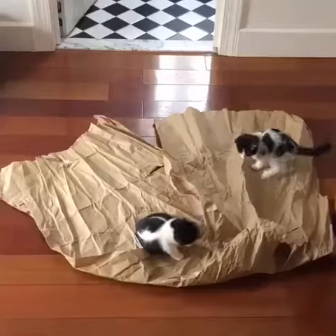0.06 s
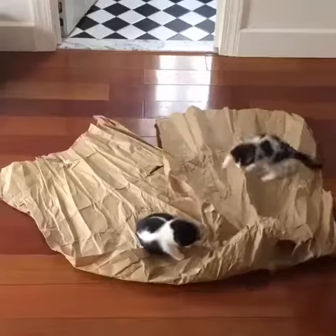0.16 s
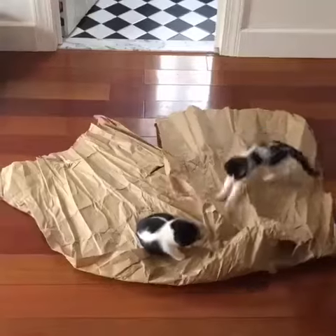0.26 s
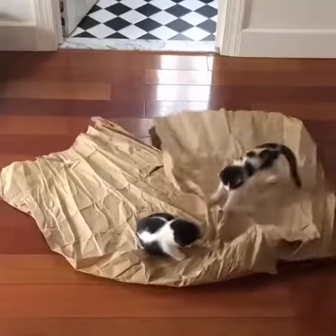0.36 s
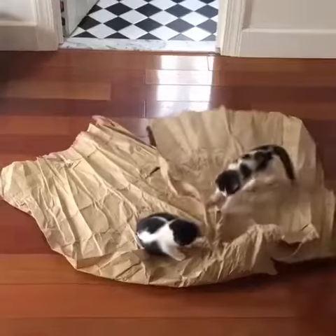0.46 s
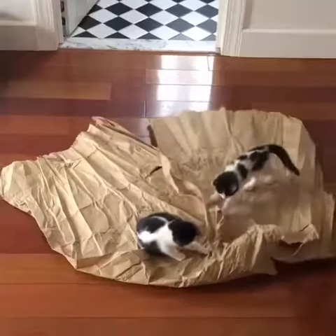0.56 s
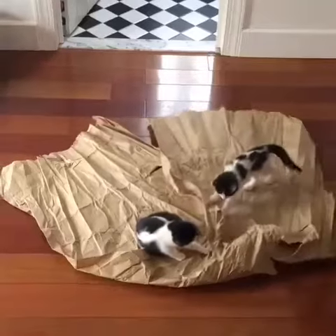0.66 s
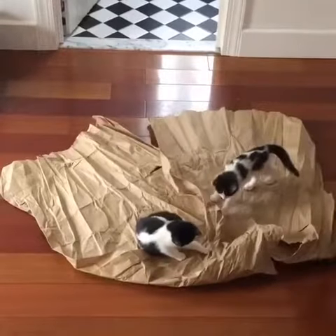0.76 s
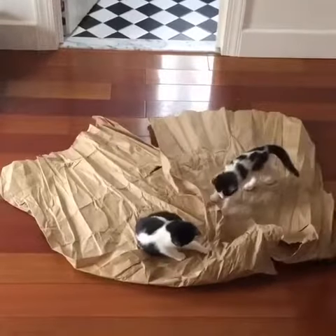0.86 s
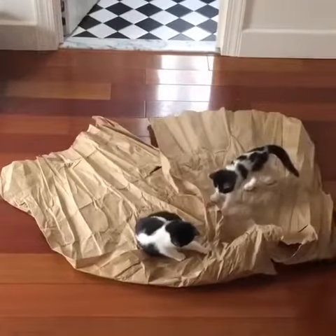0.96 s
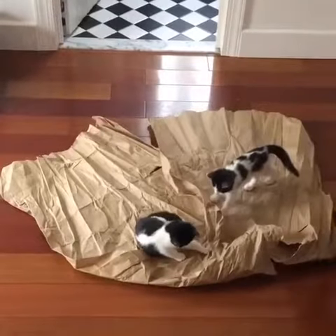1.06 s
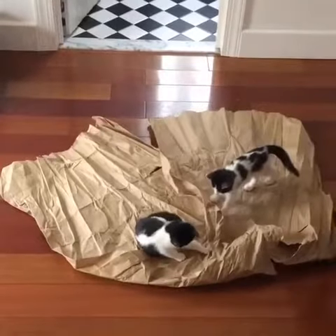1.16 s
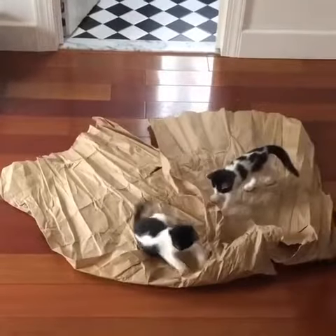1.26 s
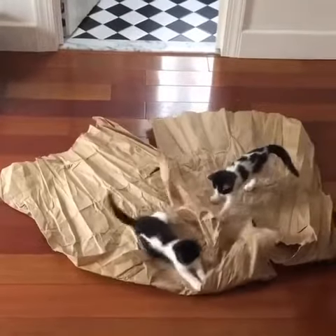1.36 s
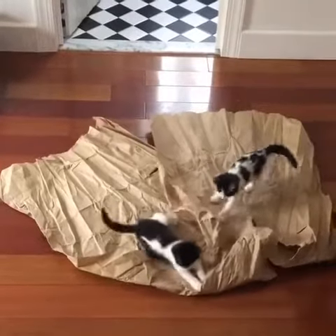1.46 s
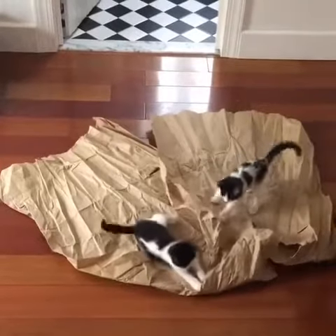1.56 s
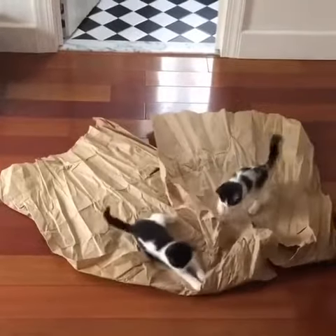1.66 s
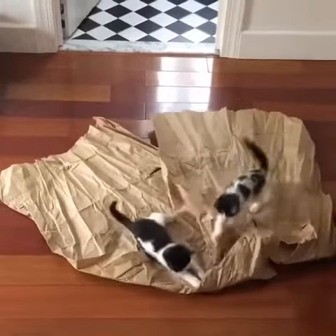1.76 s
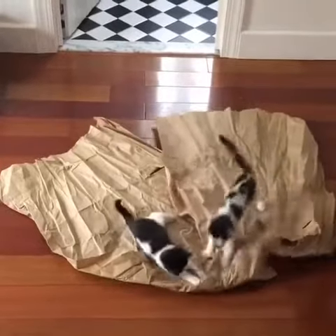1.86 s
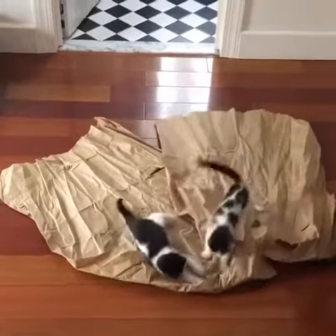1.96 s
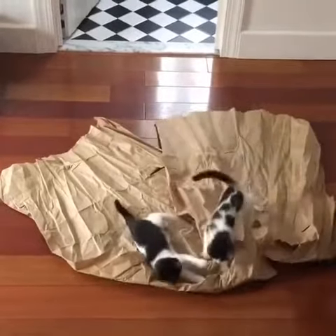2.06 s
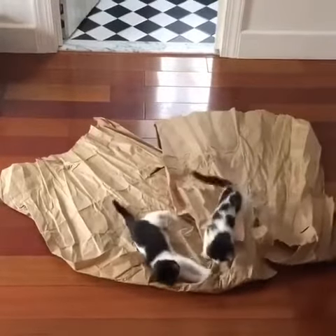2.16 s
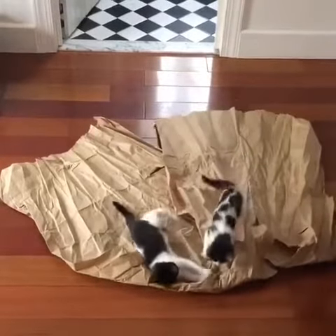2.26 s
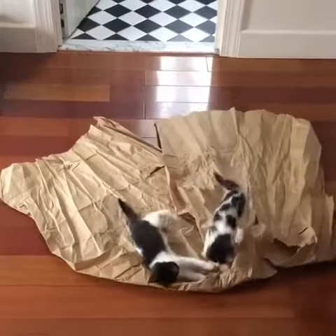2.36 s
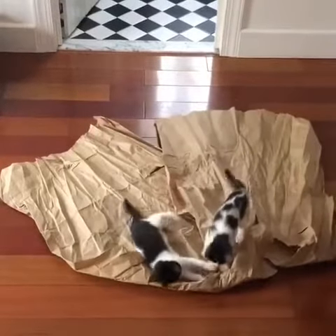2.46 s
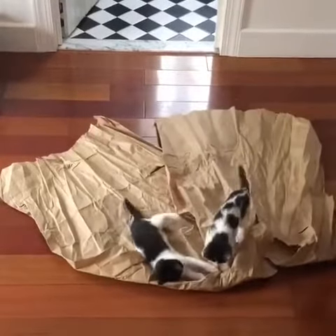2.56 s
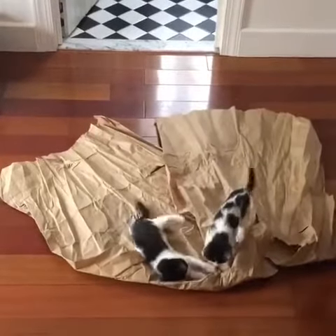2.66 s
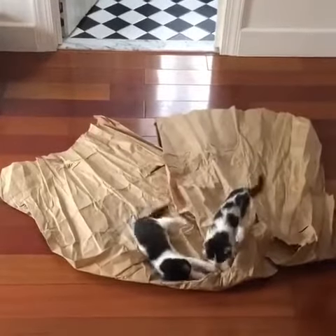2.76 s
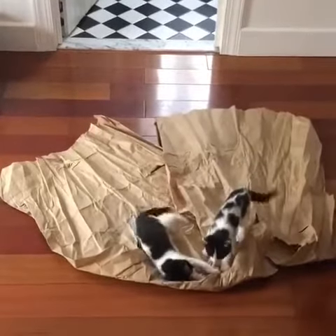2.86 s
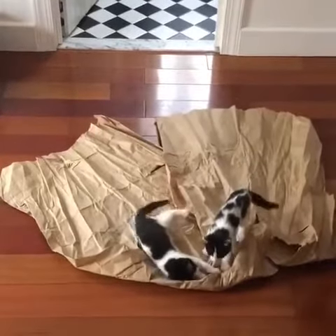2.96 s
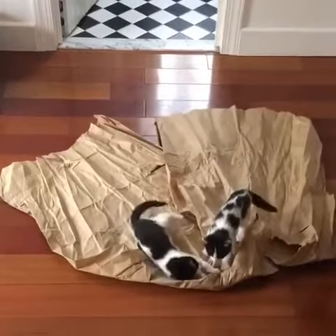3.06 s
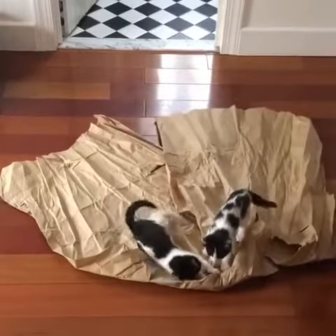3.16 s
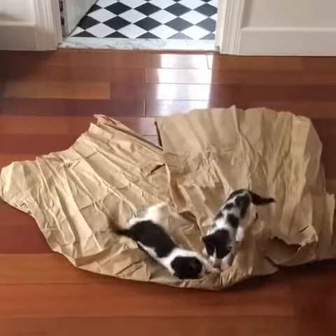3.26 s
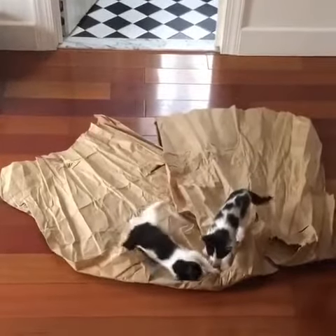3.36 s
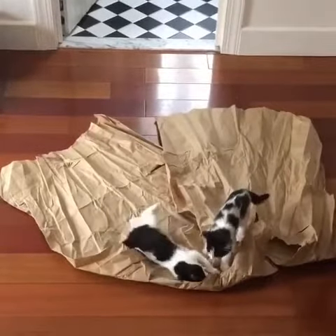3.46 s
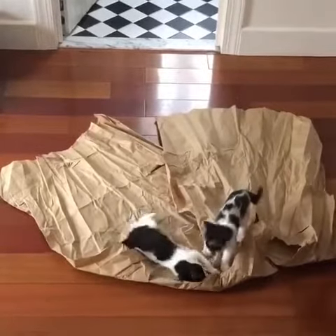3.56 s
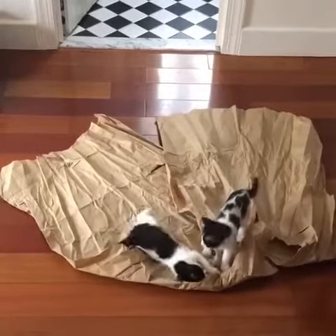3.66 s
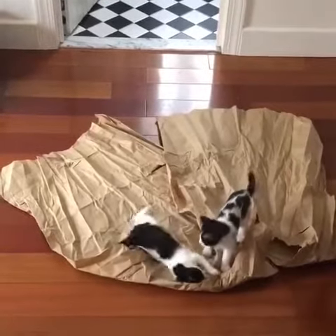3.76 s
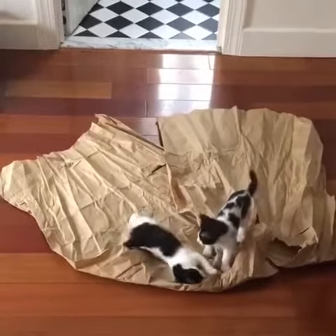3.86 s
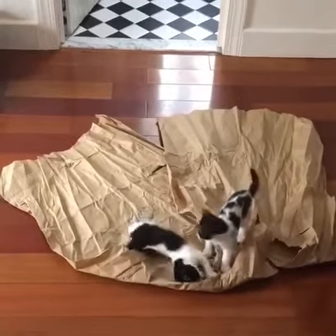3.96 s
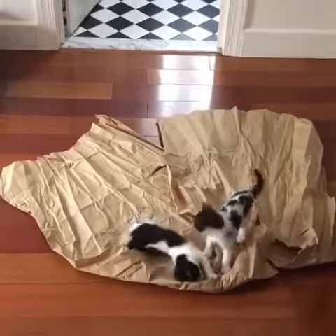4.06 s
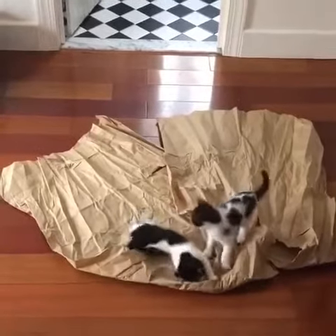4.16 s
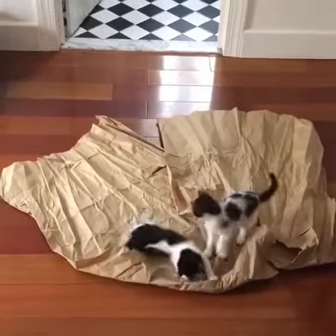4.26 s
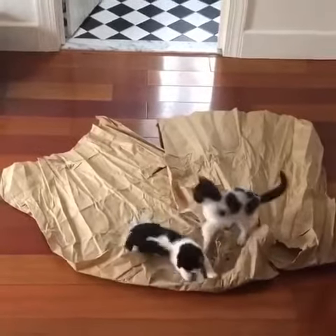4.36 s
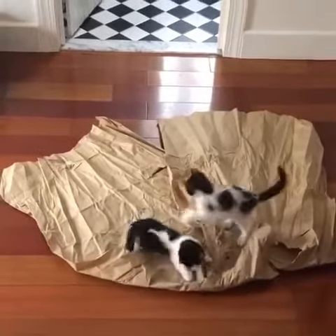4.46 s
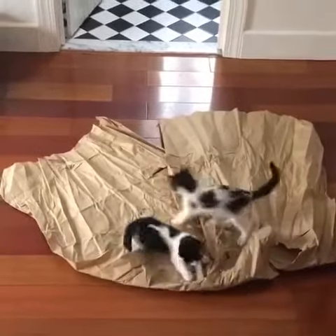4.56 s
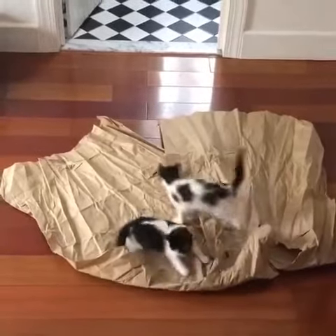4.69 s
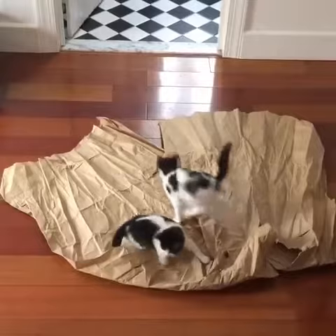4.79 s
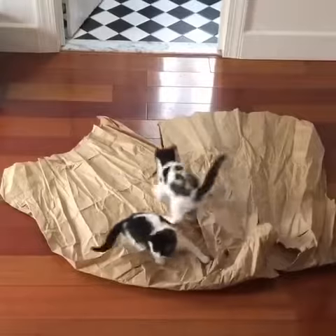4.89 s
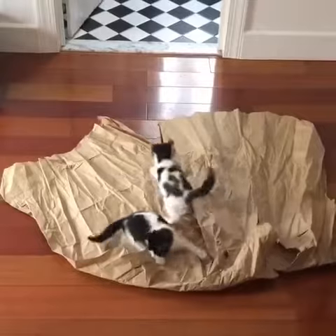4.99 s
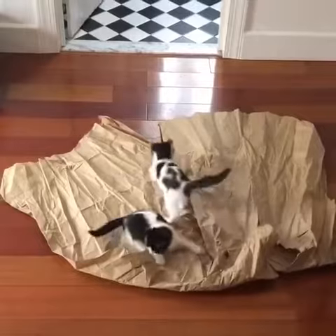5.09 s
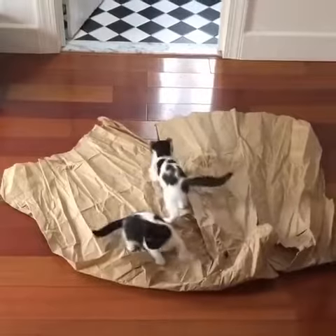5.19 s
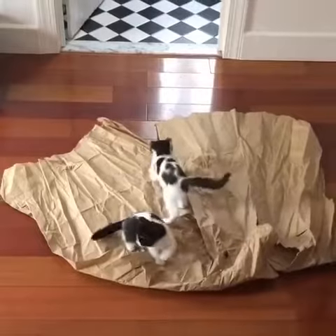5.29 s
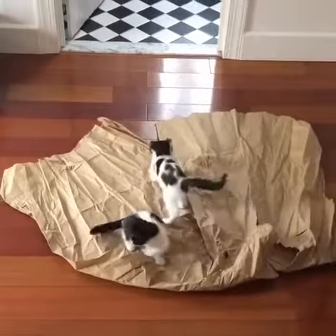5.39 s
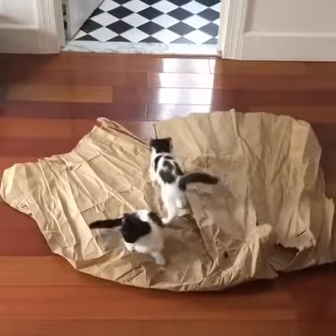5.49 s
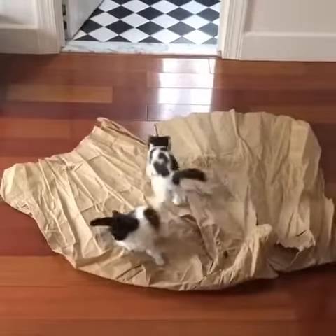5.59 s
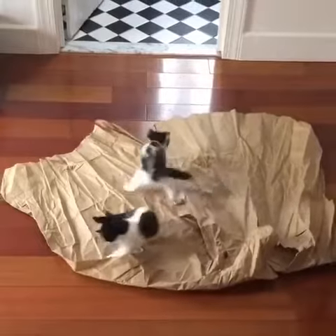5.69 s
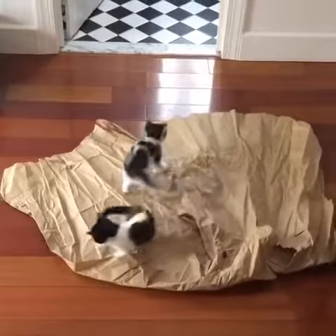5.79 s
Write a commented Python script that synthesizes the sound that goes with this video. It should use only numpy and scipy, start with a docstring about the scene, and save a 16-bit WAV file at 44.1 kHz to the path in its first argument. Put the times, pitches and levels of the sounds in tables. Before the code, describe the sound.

Sharp paper snaps and dry crinkling come in quick flurries over padded knocks on wooden boards, in a lightly echoing room.

```python
"""A soft knock comes first, then bursts of crackling: two kittens pounce on crumpled packing paper on a floor.
Each move sets off a swarm of short decaying tones, one for each tiny crease that buckles in the sheet.
Stiff creases snap alone (a ring, a rattle and a crack), and paws thump the boards with low, damped rings.
A phone held above hears it all in a bare, ringing room of noise-built echoes, with faint air and a low hum."""
import sys
import numpy as np
from scipy import signal
from scipy.fft import rfft, irfft, next_fast_len
from scipy.io import wavfile
from scipy.ndimage import uniform_filter1d, map_coordinates

SR = 44100
rng = np.random.default_rng(int(sys.argv[2]) if len(sys.argv) > 2 else 0)


def unload_audio(sound):
    """Save the sound as a 16-bit wav file, at the path given as the first command line argument."""
    columns = np.transpose(np.atleast_2d(sound))
    # keep every value between -1 and 1, then stretch to whole-number steps
    steps = np.round(np.clip(columns, -1, 1) * 32767)
    wavfile.write(sys.argv[1], SR, steps.astype(np.int16))


N = 257103
TIME = np.arange(N) / SR  # seconds


def undb(db):
    """Turn decibels into a gain."""
    return 10 ** (np.asarray(db) / 20)


def unit(x):
    """Scale a sound to an rms (average strength) of 1."""
    return x / np.sqrt(np.mean(x ** 2))


def along_hz(hz, points):
    """Read between (f/Hz, value) points, with pitch spaced in octaves as we hear it."""
    f, value = np.transpose(points)
    return np.interp(np.log(np.maximum(hz, 1)), np.log(f), value)


def colour(x, points):
    """Make some pitches louder and others softer, following (f/Hz, level/dB) points."""
    size = next_fast_len(len(x) + 4096)
    gain = undb(along_hz(np.fft.rfftfreq(size, 1 / SR), points))
    return irfft(rfft(x, size) * gain, size)[:len(x)]


def band(x, lo_hz, hi_hz, order=3):
    """Keep mostly the pitches between two edges."""
    edges = [lo_hz, min(hi_hz, .48 * SR)]
    return signal.sosfilt(signal.butter(order, edges, "bandpass", fs=SR, output="sos"), x)


def fade(t, t60):
    """Die away smoothly, losing 60 dB in t60 seconds."""
    return np.exp(-np.log(1000) * t / t60)


def place(times, sounds):
    """Add up short sounds, one a row, each at its own start time in seconds."""
    index = (np.asarray(times) * SR).astype(int)[:, None] + np.arange(sounds.shape[1])
    return np.bincount(index.ravel(), sounds.ravel(), N)[:N]


def walk(rate):
    """Wander at random: a new level every 1 / rate seconds, smoothed twice, with rms 1."""
    hold = int(SR / rate)
    steps = np.repeat(rng.standard_normal(N // hold + 1), hold)
    smooth = uniform_filter1d(uniform_filter1d(steps, hold), hold)
    return unit(smooth[:N])


def rustle():
    """Wide panels of paper flap low, thumb-sized facets crinkle, and the smallest wrinkles fizz."""
    crinkle_db, flap_db, fizz_db = play()
    # one buckling crease sets off its neighbours, so the crackle surges in little avalanches
    surge_db = 3.2 * np.tanh(walk(90))
    flap = creases(crinkle_db + flap_db, 150.7, 990, t60=0.041, spread_db=3.5,
                   thinning=.25, patchy_db=10.5, count=6000, size=1200)
    crinkle = creases(crinkle_db, 953, 4624, t60=0.0072, spread_db=3.8,
                      thinning=.33, patchy_db=11, count=17000, size=340)
    fizz = creases(crinkle_db + fizz_db, 4270, 16600, t60=0.001, spread_db=5.5,
                   thinning=.25, patchy_db=4, count=40000, size=80)
    crackle = undb(-0.56) * crinkle + undb(-0.7) * fizz
    return undb(-1.54) * flap + undb(surge_db) * crackle


# how strongly the paper sounds at each pitch (f/Hz, relative level/dB)
PAPER_COLOUR = [(88, -47), (150, -4.5), (273, -9), (318, -11.5), (545, -10.5), (772, -5), (850, -7),
                (1380, 2.5), (1700, -0.5), (2450, 2), (6300, -12.5), (10400, -22.5), (12600, -20.5),
                (15000, -32)]


def creases(level_db, lo_hz, hi_hz, t60, spread_db, thinning, patchy_db, count, size):
    """Tiny facets buckle and ring, each with its own moment, pitch and strength; gentle moves buckle fewer."""
    when, pitch, phase, luck, force = rng.random((count, 5)).T
    times, hz = when * TIME[-1], lo_hz + pitch * (hi_hz - lo_hz)
    # share: the chance that a facet buckles, up to 1 at the liveliest moment
    share = undb(thinning * (np.interp(times, TIME, level_db) - level_db.max()))
    buckles = luck < share
    strength = undb(spread_db * np.minimum(-np.log(force), 3.5)) * buckles / np.sqrt(share)
    # each new patch of the sheet has facets that favour their own few pitches
    patches_per_s, pitches_per_octave = 11, 4.5
    patches = rng.standard_normal((80, 32))
    where = [times * patches_per_s, np.log2(hz / lo_hz) * pitches_per_octave]
    favour = map_coordinates(patches, where, order=1)
    # a big pounce loads many patches at once, which evens the colour out
    strength = strength * undb(patchy_db * (1 - 0.9 * share) * np.tanh(favour))
    t = np.arange(size) / SR
    rings = np.sin(2 * np.pi * (hz[:, None] * t + phase[:, None])) * fade(t, t60)
    swarm = colour(band(place(times, rings * strength[:, None]), lo_hz, hi_hz), PAPER_COLOUR)
    # even out the swarm's own loudness, so that the move sets how loud it is
    power = uniform_filter1d(swarm ** 2, size=4000)
    return swarm / np.sqrt(power + 0.084 * power.mean()) * undb(level_db)


BUILD_UP_DB = 20  # how far a move swells during its build-up
SETTLE_DB_PER_S = 177.5  # the sheet settles when the paw stops
LINGER_DB, LINGER_DB_PER_S = -17, 79  # a weaker creaking outlasts each move
REST_DB = (-80, -71.5, -83)  # crinkle, flap and fizz under kittens that only shift their weight
# from the time the kittens meet, they never quite leave the paper still (same three sounds)
SCUFFLE_S, SCUFFLE_DB = 1.9, (-67, -71.5, -71.5)
# pounces, steps and swipes on the paper (t/s at full force, crinkle level/dB before the mix, build-up t/s,
# hold t/s, flapping of the whole sheet relative level/dB, fine fizz relative level/dB)
POUNCES = [(0.005, -86.5, .02, 0.065, 18.5, -19), (0.215, -45, 0.054, 0.011, -10.5, -1.5),
           (0.388, -35, 0.012, 0.0072, -7, -7.5), (0.43, -35.5, 0.013, .02, -3.5, -0.5),
           (0.596, -59, .05, 0.025, -3.5, -3.5), (1.357, -53, 0.021, 0.012, -11, -4),
           (1.438, -35, 0.026, 0.012, -3.5, -7), (1.473, -39.5, 0.042, 0.0087, 2.5, -3.5),
           (1.65, -49.5, 0.076, 0.009, -5, -4.5), (1.88, -45.5, 0.067, 0.035, -13, -1.5),
           (1.945, -34.5, 0.071, 0.048, -7.5, -3.5), (2.1, -41.5, 0.08, 0.019, -6, -7.5),
           (2.19, -46.5, 0.078, 0.091, -10, -7), (2.413, -51, 0.18, .05, -6.5, -9),
           (2.54, -51.5, 0.02, 0.018, -13, -6.5), (2.66, -48.5, 0.093, 0.0082, -10, -13),
           (2.873, -45.5, 0.036, 0.0054, -11.5, -7.5), (3.085, -57, 0.048, 0.073, -11.5, -9),
           (3.244, -52.5, 0.023, 0.12, -11, -8), (3.434, -48.5, 0.14, 0.054, -4, -4),
           (3.734, -55.5, 0.011, 0.024, -4.5, -9), (4.012, -50, .02, 0.018, -24, -9.5),
           (4.093, -51, 0.11, 0.026, -2.5, -3.5), (4.212, -50.5, 0.058, 0.0058, -14, -11),
           (4.455, -51, 0.15, .06, -8, -8.5), (4.596, -49, 0.017, .01, -10.5, -7.5),
           (4.656, -62, 0.033, 0.038, 3.5, -3.5), (4.753, -51, .035, 0.0042, -9.5, -3.5),
           (4.866, -47.5, 0.043, 0.091, -12, -6), (5.039, -48, 0.056, 0.078, -8, -2.5),
           (5.202, -41.5, 0.095, 0.013, -9.5, -5), (5.521, -52, 0.029, 0.22, -9.5, -3.5),
           (5.753, -42.5, 0.09, 0.011, -9.5, -3.5)]


def play():
    """Each move builds up, holds, settles and lingers; gives crinkle dB, then flap and fizz relative to it."""
    power = undb(REST_DB)[:, None] ** 2 + undb(SCUFFLE_DB)[:, None] ** 2 * (TIME > SCUFFLE_S)
    for s, db, build_up_s, hold_s, flap_db, fizz_db in POUNCES:
        early, late = np.maximum(s - TIME, 0), np.maximum(TIME - s - hold_s, 0)
        release = undb(-SETTLE_DB_PER_S * late) + undb(LINGER_DB - LINGER_DB_PER_S * late)
        force = undb(db - BUILD_UP_DB * early / build_up_s) * release / (1 + undb(LINGER_DB))
        power = power + np.array([force, force * undb(flap_db), force * undb(fizz_db)]) ** 2
    crinkle, flap, fizz = 10 * np.log10(power)
    return crinkle, flap - crinkle, fizz - crinkle


# extra sound that a snap sends straight at the phone; high-pitched facets beam more
BEAM_DB, BEAM_DB_PER_OCTAVE, BEAM_HZ = 0.5, 4, 2200
# stiff creases snapping through (t/s, level/dB before the mix, facet pitch f/Hz,
# rattle of the paper round it relative level/dB, sharp crack relative level/dB)
STIFF_CREASES = [(0.2186, -32, 2600, -27.5, -8), (0.242, -41, 2670, -14, -18), (.286, -39, 2740, -25, -20),
                 (.386, -36.5, 3640, -8, -4.5), (0.4222, -29, 2780, -4, -11),
                 (1.069, -54.5, 1626, -4, -30.5), (1.197, -62, 5030, -14, -12),
                 (1.411, -38.5, 2340, -8, -14), (1.433, -23.5, 1460, -16, -14),
                 (1.811, -54.5, 4700, -5, -4), (1.8458, -36.5, 2190, -4, -28),
                 (1.978, -28.5, 1380, -5, -22), (2.0838, -32.5, 1300, 2.5, -25), (2.109, -37, 1400, 2, -10),
                 (2.141, -38, 1320, -4, -19), (2.201, -39.5, 2200, 0, 1.5),
                 (2.333, -37.5, 2100, -20, -23.5), (2.682, -41, 706, -6, -33),
                 (2.872, -40, 1330, -13, -0.5), (3.2433, -47, 2650, -3, -15),
                 (3.2553, -41, 5480, -11.5, -1.5), (3.4053, -41.5, 2380, -11, -1),
                 (3.43, -45, 4440, -18, 3.5), (3.587, -50.5, 2290, 2.5, 3), (3.734, -45.5, 1530, 1, -6),
                 (3.7773, -30.5, 2316, -9, -12.5), (3.9908, -38.5, 1420, -5, -22),
                 (3.992, -39.5, 3400, -20, -9.5), (4.3801, -48, 1700, -4, -28),
                 (4.467, -48, 3280, 4.5, -2.5), (4.5944, -41, 1950, 1, -11), (4.7023, -40, 1440, -19, -25),
                 (5.057, -38, 2850, -9.5, 0), (5.389, -45.5, 1550, -11, -47),
                 (5.758, -38.5, 2550, -10, -14)]


def snaps(ring_t60=0.0059, crack_t60=0.0064, size=800):
    """A stiff crease flips: facet rings, paper rattles, fold cracks. Gives (to the phone, to the room)."""
    s, db, hz, rattle_db, crack_db = np.vstack([STIFF_CREASES, stray_snaps()]).T[:, :, None]
    t = np.arange(size) / SR
    span = .004 * SR  # 4 ms in samples

    def even(rows):
        """Give every row the same energy: that of rms 1 lasting one span."""
        return rows * np.sqrt(span / np.sum(rows ** 2, axis=1, keepdims=True))

    burst = rng.standard_normal((len(s), size)) * fade(t, crack_t60)
    soft_start = (1 - np.exp(-t * hz)) ** 2
    ring = even(np.sin(2 * np.pi * hz * t) * fade(t, ring_t60) * soft_start)
    rattle = even(band(burst, 1170, 2730, order=2))
    # a bright, hissing crack: a high band, then a gentle filter that favours its lower end
    crack = even(band(band(burst, 5120, 13800), 3200, 3930, order=1))
    sounds = undb(db) * (undb(-2.5) * ring + undb(rattle_db) * rattle + undb(crack_db) * crack)
    beam_db = BEAM_DB + BEAM_DB_PER_OCTAVE * np.log2(hz / BEAM_HZ)
    return place(s[:, 0], sounds * undb(beam_db)), place(s[:, 0], sounds)


def stray_snaps(over_db=5, scatter_db=2, lo_hz=1300, hi_hz=2900, rattle_db=-5, crack_db=-9,
                ceiling_db=-44, count=24):
    """Lesser creases snap at random in the scuffle, louder in lively play; rows like those of STIFF_CREASES."""
    when, pitch, force = rng.random((count, 3)).T
    s = SCUFFLE_S + when * (TIME[-1] - SCUFFLE_S)
    lively_db = np.interp(s, TIME, play()[0])
    db = np.minimum(lively_db + over_db, ceiling_db) + scatter_db * (2 * force - 1)
    hz = lo_hz * (hi_hz / lo_hz) ** pitch
    return np.c_[s, db, hz, np.full(count, rattle_db), np.full(count, crack_db)]


# soft knocks of paws and bodies on the boards; close rows together make one blow
# (t/s, level/dB before onset, fade and mix, pitch f/Hz)
KNOCKS = [(0.04, -54, 124), (0.427, -47, 160), (0.463, -44, 74.5), (1.476, -38, 139), (1.513, -38, 226),
          (1.947, -37.5, 250), (1.955, -37.5, 105), (1.972, -37, 323), (2.351, -50, 124), (2.468, -47, 122),
          (3.104, -48, 103), (4.979, -44, 121), (5.072, -54, 76.6), (5.439, -45, 204), (5.515, -36.5, 97),
          (5.558, -42.5, 330), (5.594, -46, 143), (5.801, -37.5, 138)]


def thumps(contact_s=0.0013, t60=0.058, size=8000):
    """A padded paw pushes slowly: each row is one low, well damped ring; close rows together make one blow."""
    s, db, hz = np.transpose(KNOCKS)[:, :, None]
    t = np.arange(size) / SR
    push = 1 - np.exp(-t / contact_s)
    return place(s[:, 0], undb(db) * np.sin(2 * np.pi * hz * t) * push * fade(t, t60))


def padding(db=-62, follow=0.16):
    """Light paws keep the boards murmuring in low noise, louder when the play is lively."""
    crinkle_db = play()[0]
    lively_db = uniform_filter1d(crinkle_db, size=8000) - crinkle_db.max()
    steps_db = 4 * np.tanh(walk(14))
    murmur = unit(band(rng.standard_normal(N), 62.5, 116.6))
    return murmur * undb(db + follow * lively_db + steps_db)


# how the room's echoes die away (f/Hz, time to lose 60 dB t/s)
ROOM_DECAY = [(125, 0.27), (500, 0.23), (2000, 0.35), (6000, 0.25), (14000, 0.19)]


def echoes(x, first_echo_s=0.0011, treble_db=3.5, count=5):
    """Floor, door and walls echo densely, each pitch range dying at its own pace, each spot with its own tail."""
    t = np.arange(SR // 2) / SR
    hz = np.fft.rfftfreq(len(t), 1 / SR)
    centres = [f for f, _ in ROOM_DECAY]
    # every 256 samples the sound comes from a spot picked at random
    spot = np.repeat(rng.integers(count, size=N // 256 + 1), 256)[:N]
    wet = 0
    for k in range(count):
        noise = rfft(rng.standard_normal(len(t)))
        tail = 0
        for pick, (_, t60) in zip(np.eye(len(centres)), ROOM_DECAY):
            part = irfft(noise * along_hz(hz, np.c_[centres, pick]), len(t))
            tail = tail + part * fade(t, t60)
        tail = tail * (t > first_echo_s)
        here = uniform_filter1d(1. * (spot == k), size=128)  # blend from spot to spot
        from_spot = x * np.sin(np.pi / 2 * here)
        wet = wet + signal.fftconvolve(from_spot, tail / np.linalg.norm(tail))[:N]
    return colour(wet, [(3000, 0.029), (8000, treble_db)])


AIR_DB = -66  # level round which the air drifts
HUM_HZ, HUM_DB = 117.7, -70
# colour of the room's air (f/Hz, relative level/dB)
AIR_COLOUR = [(15, -58), (25, -12), (75, -0.5), (181, -0.5), (231, -25.5), (301, -5.5), (588, -34),
              (1670, -17.5), (1860, -20), (4620, -27.5), (5010, -63), (5420, -28.5), (15000, -33.5)]


def background():
    """The room's faint air is coloured noise; the wavering hum is noise squeezed into a narrow band."""
    air = unit(colour(rng.standard_normal(N), AIR_COLOUR)) * undb(AIR_DB + .5 * walk(4.17))
    hum = unit(band(rng.standard_normal(N), HUM_HZ - 4, HUM_HZ + 4, order=2)) * undb(HUM_DB)
    return air + hum


def scene():
    """Mix paper and paws, direct and echoed, over the background."""
    swarm, knocks = rustle(), thumps()
    beamed, scattered = snaps()
    paper = undb(-4.5) * (swarm + beamed) + undb(-1.87) * echoes(swarm + scattered, count=4)
    boards = undb(-1.5) * knocks + undb(2.0) * echoes(knocks, count=1) + padding()
    return (paper + boards + background())[None]


def record(dry):
    """The phone thins the deepest bass and cuts the top."""
    thinned = signal.sosfilt(signal.butter(2, 32, "highpass", fs=SR, output="sos"), dry)
    top_hz = 14400
    return signal.sosfilt(signal.ellip(8, .2, 70, top_hz, fs=SR, output="sos"), thinned)


dry = scene()
out = record(dry)
unload_audio(out)
```